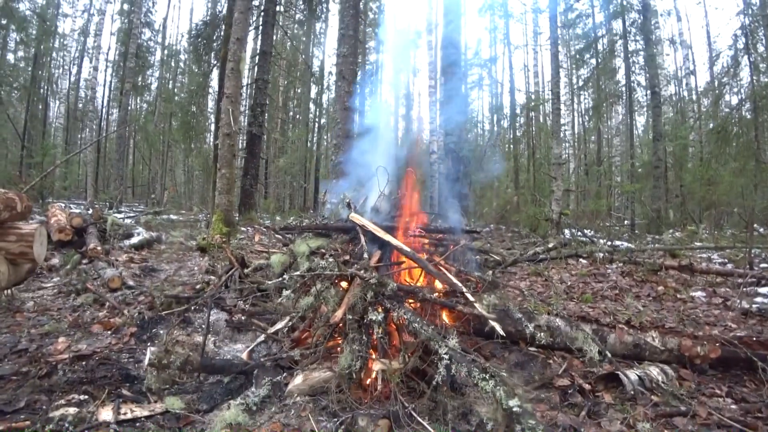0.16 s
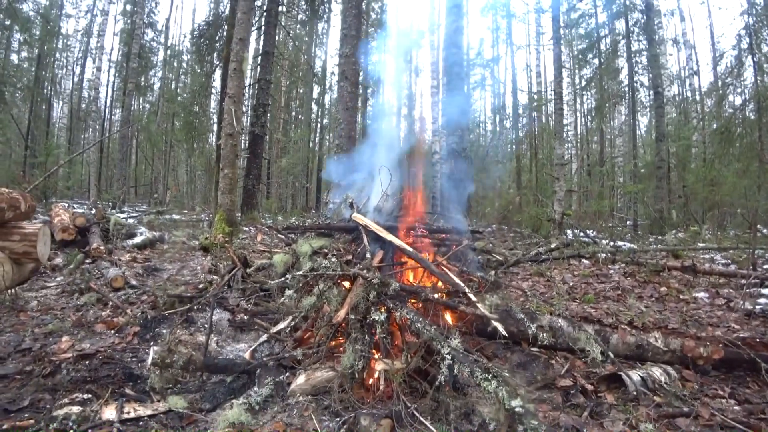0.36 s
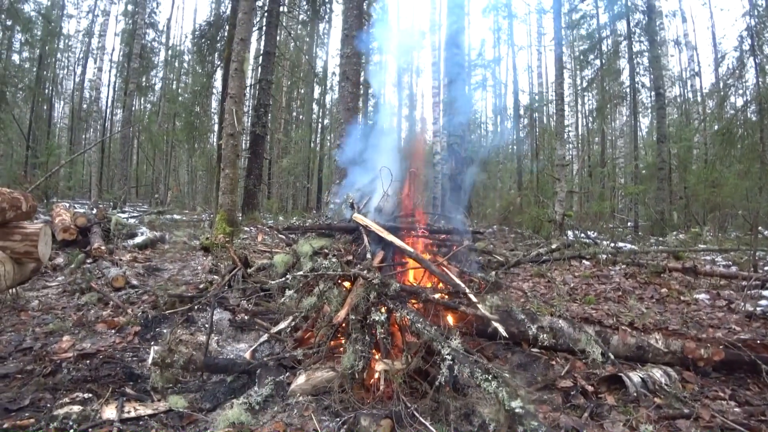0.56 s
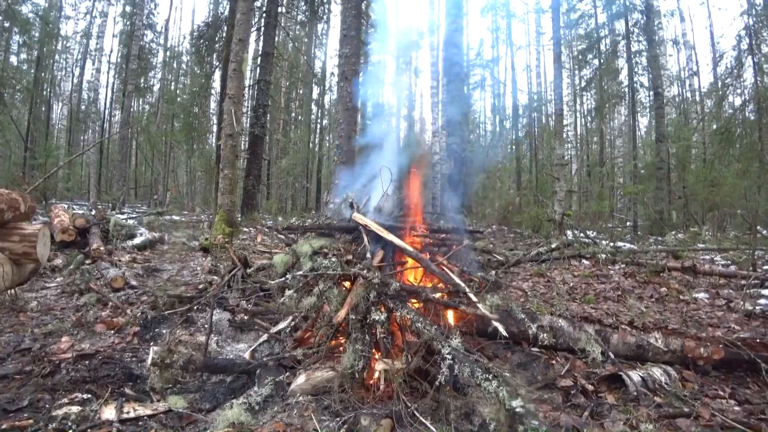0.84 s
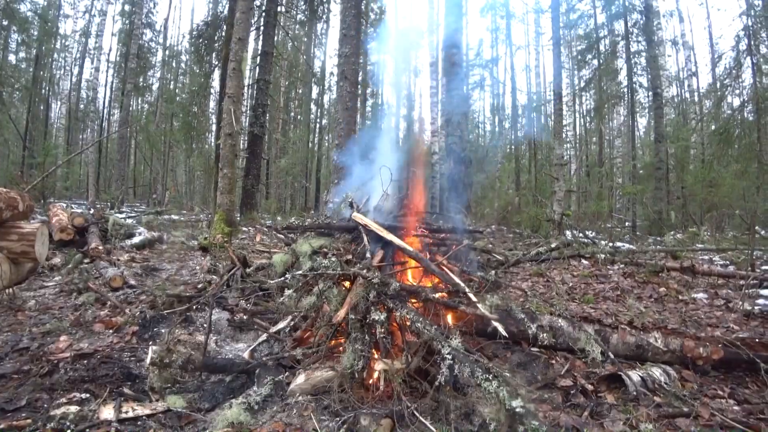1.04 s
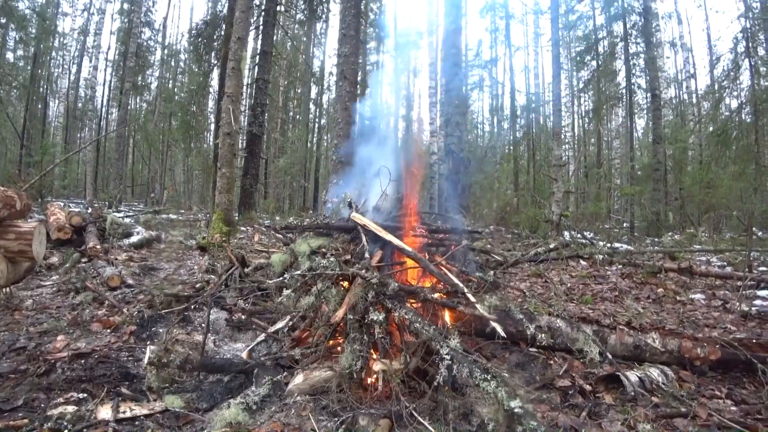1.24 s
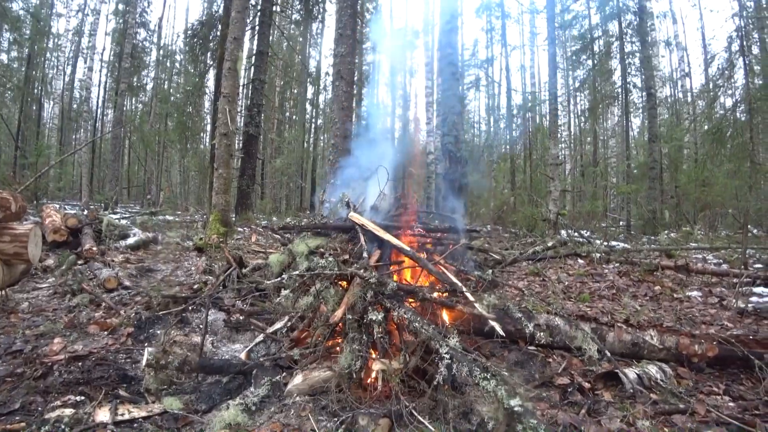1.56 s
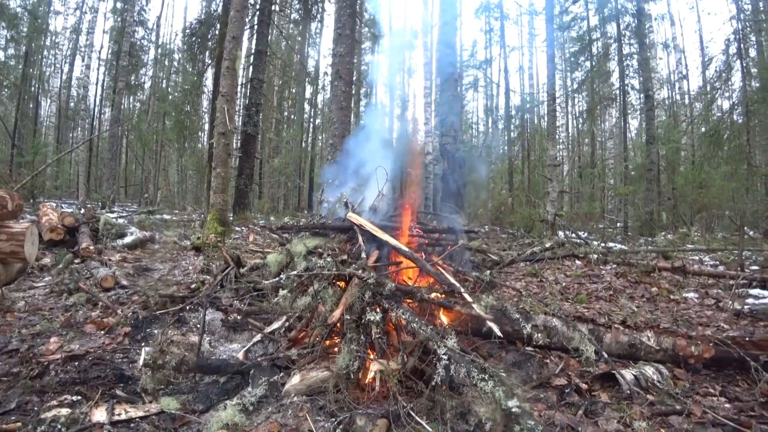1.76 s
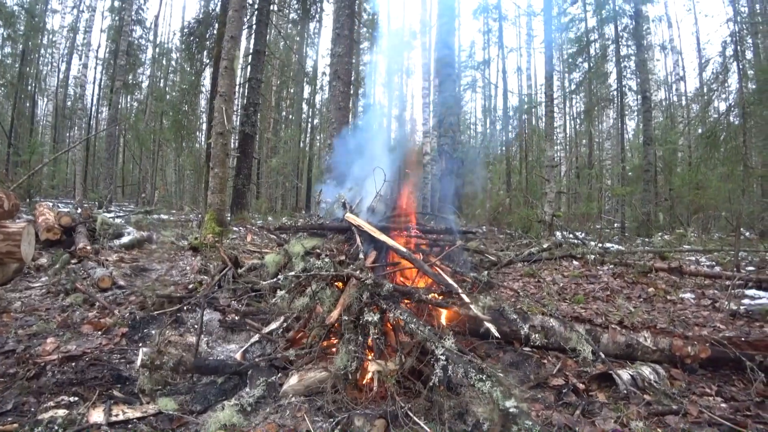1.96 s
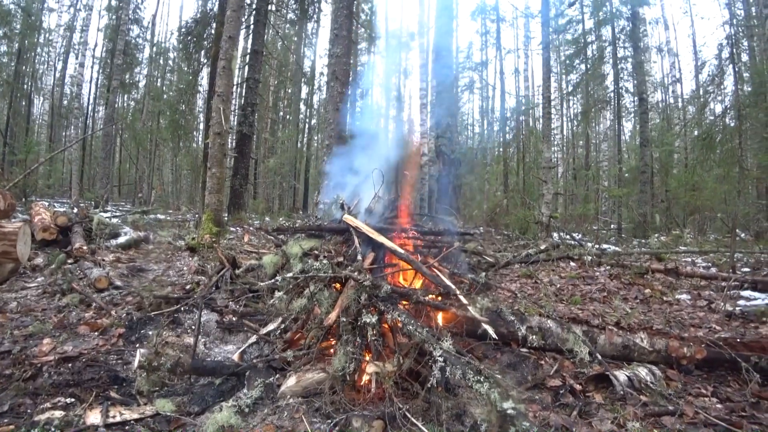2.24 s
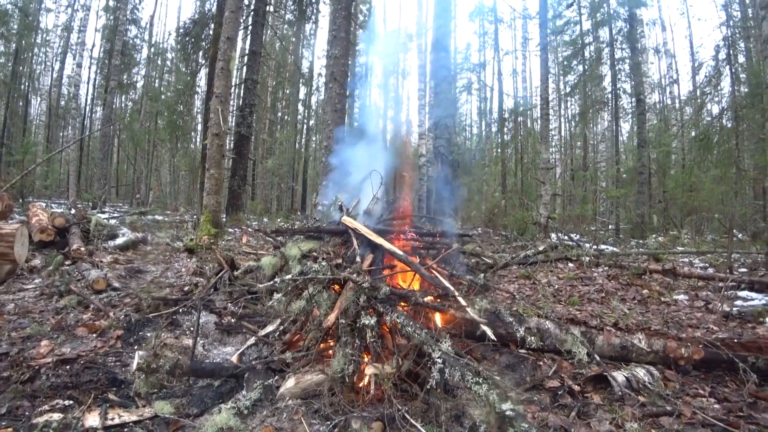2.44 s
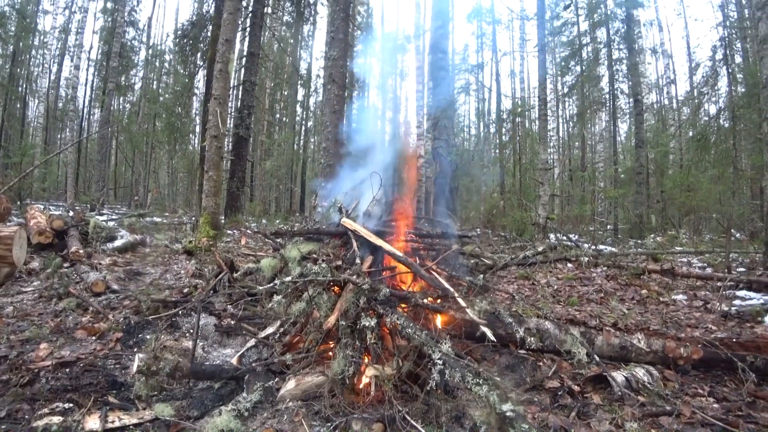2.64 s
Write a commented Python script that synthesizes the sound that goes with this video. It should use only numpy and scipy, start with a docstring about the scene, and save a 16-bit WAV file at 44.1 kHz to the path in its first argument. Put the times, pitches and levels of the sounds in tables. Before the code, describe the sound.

Campfire outdoors, fairly close stereo microphone: continuous tiny crackles and crisp bright snaps, busiest in the first second, one very loud crack midway, then sparser pops over quiet steam hiss and flame rumble, with little echo.

```python
"""Forest clearing, a heap of damp branches burning a few metres from a small stereo microphone.
Sap pockets burst as sharp pops: clicks and short noise puffs ringing a resonance, some with wooden thumps.
Countless random crackles are smaller snaps of the same kind; flame flutter and steam hiss are
flickering banded noise. The ground and nearby surfaces return a few early echoes, then come a brief
scatter and a longer wash."""
import sys
import numpy as np
from scipy import signal
from scipy.fft import rfft, irfft
from scipy.io import wavfile

SR = 44100
rng = np.random.default_rng(int(sys.argv[2]) if len(sys.argv) > 2 else 0)


def voltage_ratio(level):
    """Linear amplitude factor for a level in decibels (scalar or array-like)."""
    return 10 ** (np.asarray(level, float) / 20)


def master(y):
    """Save y as 16-bit WAV."""
    cut = np.clip(np.atleast_2d(y).T, -1, 1)
    pcm = np.round(cut * 32767)  # scale
    wavfile.write(sys.argv[1], SR, pcm.astype(np.int16))


N = 123479

# Loud pops. Each row: start in seconds, source peak in dB, pocket resonance in Hz.
LOUD_POPS = [(0.0939, -22, 6640), (0.102, -24.5, 3780), (0.2207, -19, 3030), (0.2327, -23.5, 9300),
             (0.241, -24, 4460), (0.2474, -12.5, 7140), (0.3141, -29, 1800), (0.3508, -19, 5200),
             (0.3762, -23, 6500), (0.4066, -24, 5140), (0.4088, -19.5, 5750), (0.429, -14.5, 4350),
             (0.445, -26, 3000), (0.4716, -28.5, 1180), (0.4935, -14.5, 5400), (0.504, -8, 5830),
             (0.521, -27, 1180), (0.5427, -20, 5070), (0.5555, -21.5, 3900), (0.5996, -21, 4540),
             (0.609, -31, 7400), (0.638, -14, 4200), (0.7018, -16, 6230), (0.7067, -14, 6900),
             (0.7332, -21.5, 4570), (0.7535, -21, 6640), (0.7821, -15.5, 6850), (0.7872, -14, 5400),
             (0.84, -24.5, 2800), (0.85, -13.5, 5800), (0.8744, -14.5, 4960), (0.8891, -24.5, 7800),
             (0.9005, -29, 1500), (0.9637, -14, 2440), (0.9934, -24, 4300), (1.0004, -15.5, 8250),
             (1.0091, -20.5, 2970), (1.0106, -11, 5000), (1.029, -17.5, 4050), (1.114, -19.5, 6260),
             (1.2009, -26, 5400), (1.2092, -19.5, 7200), (1.2245, -21.5, 1370), (1.2328, -29.5, 2600),
             (1.2709, -14, 6900), (1.281, -20.5, 6400), (1.3467, -20, 4900), (1.4167, -11.5, 7800),
             (1.442, -20, 6400), (1.4605, -24, 4200), (1.5104, 1.5, 2130), (1.543, -24.5, 4500),
             (1.557, -24, 6100), (1.6056, -31, 6470), (1.6124, -17, 5100), (1.6634, -24, 3940),
             (1.674, -29, 2500), (1.6865, -20, 5240), (1.7007, -18, 4950), (1.7127, -9, 3700),
             (1.7667, -10.5, 9050), (1.806, -30.5, 6750), (1.8885, -18, 4900), (1.925, -24, 3500),
             (1.9976, -16.5, 3660), (2.021, -6.5, 4600), (2.1538, -21, 5800), (2.1897, -23.5, 4640),
             (2.2895, -7.5, 4700), (2.2915, -12.5, 4540), (2.311, -19.5, 2800), (2.3196, -22, 3970),
             (2.327, -16.5, 4500), (2.485, -26, 6660), (2.5224, -7.5, 2540), (2.5365, -13.5, 6200),
             (2.6806, -26.5, 6400), (2.6992, -21.5, 7100), (2.7037, -20.5, 5600), (2.7197, -25.5, 2470),
             (2.766, -22, 6300)]
# Pops whose pocket rings on at one pitch.
# Each row: start in seconds, source peak in dB, pitch in Hz, resonance width in Hz.
RINGING_POPS = [(0.2918, -5.5, 5100, 700), (0.2944, -5, 7300, 300), (0.7956, -7.5, 4700, 650),
                (2.5028, -5.5, 5570, 800)]
# Pressure pulses. Each row: start in seconds, knock peak in dB, knock pitch in Hz, low push peak in dB.
PRESSURE_PULSES = [(0.2474, -28, 905, -47), (0.2917, -19, 1110, -19), (0.429, -28.5, 1250, -48),
                   (0.7818, -30, 830, -37.5), (0.7876, -28.5, 1350, -36), (0.8744, -32.5, 1310, -36),
                   (0.9632, -47, 1390, -47), (1.0296, -21, 1170, -24), (1.2231, -27, 1340, -38),
                   (1.5104, -22, 1390, -26.5), (1.5424, -32.5, 1310, -37), (1.713, -31.5, 630, -38.5),
                   (1.9251, -31.5, 550, -44), (1.9974, -34, 1160, -34.5), (2.0206, -29, 1070, -38),
                   (2.2923, -24.5, 1740, -24.5), (2.5222, -31.5, 900, -25.5)]
# Early echoes off the ground and nearby surfaces.
# Each row: delay in seconds, left gain in dB, right gain in dB.
EARLY_ECHOES = [(.0032, -24, -15), (.0099, -22, -16), (.0172, -26, -32)]
# Stereo phase of the direct sound. Each row: frequency in Hz, lead of left over right in radians.
LEFT_LEAD = [(100, 0.1), (350, 0.84), (1000, 0.89), (1800, 0), (3300, 1), (5300, 0), (8000, 0.28),
             (10500, 0.34)]
# The fire's vigour. Each row: time in seconds, flame flutter level in dB, hiss level in dB.
FIRE_VIGOUR = [(0.0, -45.5, -48), (0.3, -44.5, -49.5), (0.7, -44, -49), (1.1, -44, -51), (1.5, -47, -51),
               (1.85, -48.5, -53), (2.4, -46.5, -54), (2.8, -48.5, -51.5)]
# Flame flutter spectrum. Each row: frequency in Hz, relative density in dB per Hz.
FLAME_SPECTRUM = [(12, -16), (20, -1.5), (54, 6), (123, 5.5), (476, -13), (944, -12.5), (1200, -17.5),
                  (1560, -31), (2640, -120)]
# Steam hiss spectrum. Each row: frequency in Hz, relative density in dB per Hz.
HISS_SPECTRUM = [(350, -18), (600, 0.5), (2120, 4), (2680, -1.5), (3780, -5.5), (6050, 2.5), (10400, -7),
                 (11500, -18), (15000, -48), (22000, -120)]
# Left-right likeness of the noise. Each row: frequency in Hz, correlation from -1 to 1.
STEREO_LIKENESS = [(60, 0.98), (130, 0.91), (270, 0.7), (580, -0.11), (1230, -0.86), (2610, 0.035),
                   (5540, 0.65), (11800, 0.29)]


def pops():
    """Sap pockets burst: each loud pop or ping is one snap."""
    events = LOUD_POPS + RINGING_POPS
    out = np.zeros(N + SR)
    noise = rng.standard_normal((len(events), 700))
    for (start_s, peak_db, hz, *width_hz), row in zip(events, noise):
        start = int(start_s * SR)
        out[start:start + len(row)] += voltage_ratio(peak_db) * snap(hz, row, *width_hz)
    return out[:N]


def snap(hz, noise, ping_width_hz=None):
    """Click and steam burst ring the pocket (in a ping, the click alone), splinters fizz; peak 1."""
    burst_t60_s, splinter_t60_s = 0.0025, 0.016
    click_db, splinter_db = 8, -13.5  # over the burst noise
    pocket_width_hz = 1300
    size = len(noise)

    puff = noise * dying(burst_t60_s, size)
    puff[0] = voltage_ratio(click_db)
    splinters = voltage_ratio(splinter_db) * noise[::-1] * dying(splinter_t60_s, size)

    if ping_width_hz:
        click = puff[0] * signal.unit_impulse(size)
        # offsets the weaker impulse response of a narrow resonance
        ringing = pocket_width_hz / ping_width_hz * resonate(click, hz, ping_width_hz)
    else:
        ringing = resonate(puff + 0.5 * splinters, hz, pocket_width_hz)
    wide_puff = 0.4 * band(puff, 0.17 * hz, 3.2 * hz)
    fizz = band(splinters, 2800, 8200)
    return peak_one(band(ringing + wide_puff + fizz, 400, 9800))


def thumps():
    """Bigger bursts send a pressure pulse: a woody resonant knock and a low push."""
    out = np.zeros(N + SR)
    click = signal.unit_impulse(2000)
    push = peak_one(band(click, 85, 400))
    for start_s, knock_db, hz, push_db in PRESSURE_PULSES:
        knock = peak_one(band(resonate(click, hz, width_hz=340), 300, 1600))
        start = int(start_s * SR)
        out[start:start + len(click)] += voltage_ratio(knock_db) * knock + voltage_ratio(push_db) * push
    return out[:N]


def crackles(vigour_db):
    """Small snaps at random times, sizes and 16 pitches, more of them when the fire is lively."""
    nominal_per_s = 300
    floor_db, spread_db, max_spreads = -49.5, 6.0, 2.8
    chance = nominal_per_s * voltage_ratio(vigour_db + 3 * drift(8)) / SR
    born = rng.random(N) < chance
    size_db = floor_db + spread_db * np.minimum(rng.exponential(1, N), max_spreads)
    impulses = voltage_ratio(size_db) * born

    pitches_hz = np.geomspace(1300, 8000, 16)
    dealt = rng.integers(0, 16, N)
    noise = rng.standard_normal((16, 500))
    out = np.zeros(N)
    for k, hz in enumerate(pitches_hz):
        out += signal.oaconvolve(impulses * (dealt == k), snap(hz, noise[k]))[:N]
    return out


def clearing(x):
    """Direct sound, a few early echoes, quick scatter off the heap and a longer wash from the trunks."""
    scatter_db, scatter_t60_s = -10, 0.026  # energy against the direct sound
    forest_db, forest_t60_s = -25.5, 0.25
    size = SR // 2
    reply = np.zeros((2, size))
    for energy_db, t60_s in ((scatter_db, scatter_t60_s), (forest_db, forest_t60_s)):
        tail = band(rng.standard_normal((2, size)), 960, 12400) * dying(t60_s, size)
        reply += voltage_ratio(energy_db) * rms_one(tail) / np.sqrt(size)
    for delay_s, left_db, right_db in EARLY_ECHOES:
        reply[:, int(delay_s * SR)] += voltage_ratio([left_db, right_db])

    lead_rad = at_hz(LEFT_LEAD, np.fft.rfftfreq(N, 1 / SR))
    turn = np.exp(0.5j * lead_rad * [[1], [-1]])
    direct = irfft(rfft(x) * turn, N)
    return direct + signal.oaconvolve(x[None], reply)[:, :N]


def flame_flutter(level_db):
    """Low flutter of the flames: noise whose bands waver slowly."""
    return voltage_ratio(level_db) * banded_noise(FLAME_SPECTRUM, patchy_db=0.8, rate_hz=9)


def steam_hiss(level_db):
    """Escaping steam: noise whose bands flicker faster than the flames."""
    return voltage_ratio(level_db) * banded_noise(HISS_SPECTRUM, patchy_db=0.8, rate_hz=25)


def banded_noise(spectrum, patchy_db, rate_hz):
    """Half-octave bands of stereo noise, each with its own level, flicker and likeness; rms 1."""
    out = 0
    together = drift(rate_hz)
    edges_hz = 16 * 2 ** np.arange(0, 9.6, 0.5)
    white = rng.standard_normal((2, 2, N))
    for k, (low_hz, high_hz) in enumerate(zip(edges_hz, edges_hz[1:])):
        mid, side = band(white[k % 2], low_hz, high_hz)
        hz = np.sqrt(low_hz * high_hz)
        alike = np.clip(at_hz(STEREO_LIKENESS, hz), -1, 1)
        flicker_db = patchy_db * (0.7 * together + drift(rate_hz))
        gain = voltage_ratio(at_hz(spectrum, hz) + flicker_db)
        stereo = np.sqrt(1 + alike) * mid + np.sqrt(1 - alike) * side * [[1], [-1]]
        out = out + gain * stereo
    return rms_one(out)


def drift(rate_hz):
    """Slow chance, rms 1: noise through a two-pole lowpass, drawn every 40 samples."""
    r = np.exp(-80 * np.pi * rate_hz / SR)
    white = rng.standard_normal(N // 40 + 2002)
    slow = signal.lfilter([1], [1, -2 * r, r * r], white)[2000:]  # settled part
    return np.interp(np.arange(N) / 40, np.arange(len(slow)), rms_one(slow))


def resonate(x, hz, width_hz):
    """A two-pole resonance, gain 1 on top."""
    r = np.exp(-np.pi * width_hz / SR)
    zeros = [(1 - r * r) / 2, 0, (r * r - 1) / 2]
    poles = [1, -2 * r * np.cos(2 * np.pi * hz / SR), r * r]
    return signal.lfilter(zeros, poles, x)


def band(x, low_hz, high_hz):
    """Butterworth bandpass."""
    edges_hz = [low_hz, min(high_hz, 0.45 * SR)]
    return signal.sosfilt(signal.butter(2, edges_hz, "band", fs=SR, output="sos"), x)


def dying(t60_s, size):
    """Exponential decay, 60 dB in t60_s."""
    return voltage_ratio(-60 * np.arange(size) / (t60_s * SR))


def at_hz(points, hz):
    """A table read on a log-frequency axis."""
    table_hz, values = np.transpose(points)
    return np.interp(np.log(hz + 1), np.log(table_hz + 1), values)


def rms_one(x):
    """Scales to rms 1."""
    return x / np.sqrt(np.mean(x ** 2) + 1e-20)


def peak_one(x):
    """Scales to peak 1."""
    return x / np.abs(x).max()


def scene():
    """Pops, thumps and crackles in the clearing over flame flutter and hiss."""
    left_up_right_down_db = 0.51
    time_s, flame_points_db, hiss_points_db = np.transpose(FIRE_VIGOUR)
    t = np.arange(N) / SR
    flame_db = np.interp(t, time_s, flame_points_db)
    hiss_db = np.interp(t, time_s, hiss_points_db)
    fire = clearing(pops() + thumps() + crackles(hiss_db - hiss_db.mean()))
    mix = fire + flame_flutter(flame_db) + steam_hiss(hiss_db)
    return mix * voltage_ratio([[left_up_right_down_db], [-left_up_right_down_db]])


def low_pass(x):
    """Removes everything above the highest recorded frequency."""
    return signal.sosfilt(signal.butter(12, 16500, fs=SR, output="sos"), x)


def record(dry):
    """Peaks clip; the top is cut steeply, a little leaks past."""
    clip_level, cutoff_hz, leak_db = 0.7, 11550, -34
    clipped = np.clip(dry, -clip_level, clip_level)
    steep = signal.cheby2(24, 50, cutoff_hz, fs=SR, output="sos")
    finished = signal.sosfilt(steep, clipped) + voltage_ratio(leak_db) * clipped
    return low_pass(finished)


dry = scene()
out = record(dry)
master(out)
```